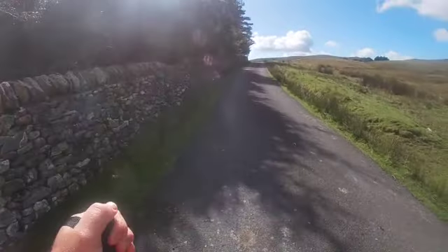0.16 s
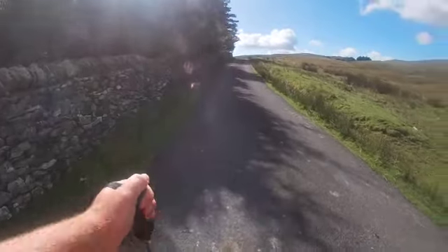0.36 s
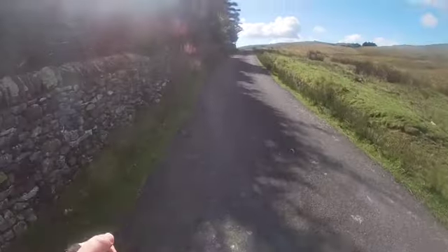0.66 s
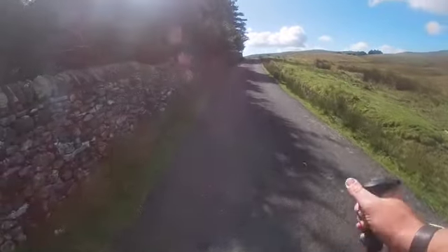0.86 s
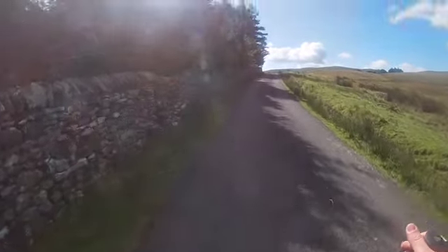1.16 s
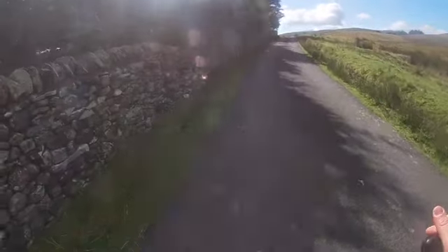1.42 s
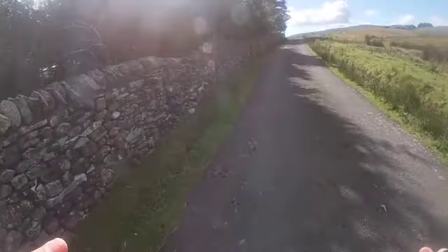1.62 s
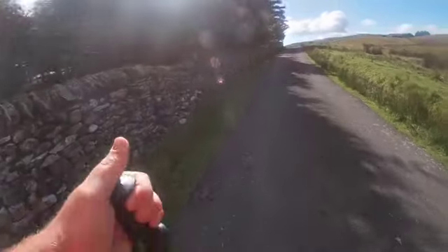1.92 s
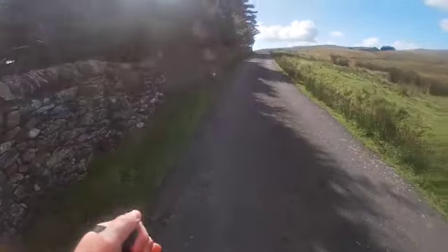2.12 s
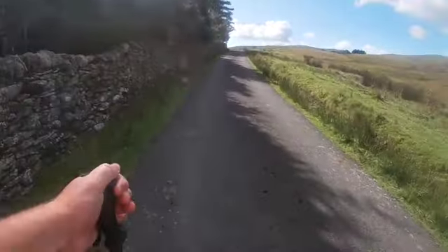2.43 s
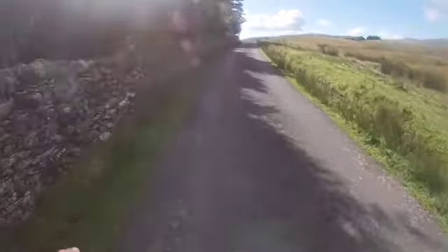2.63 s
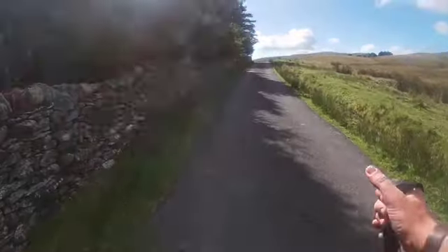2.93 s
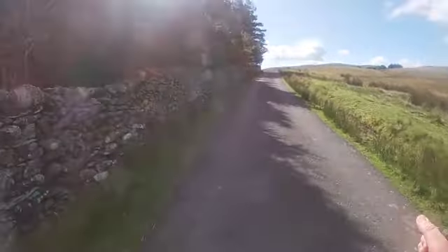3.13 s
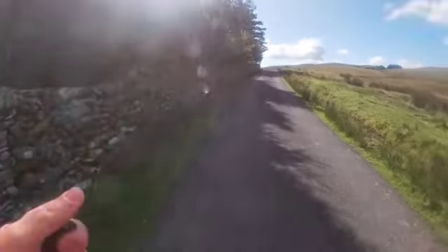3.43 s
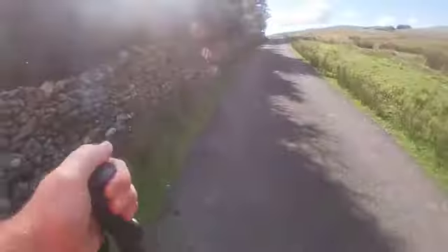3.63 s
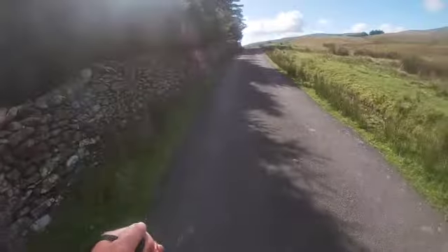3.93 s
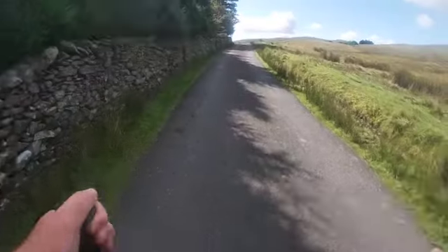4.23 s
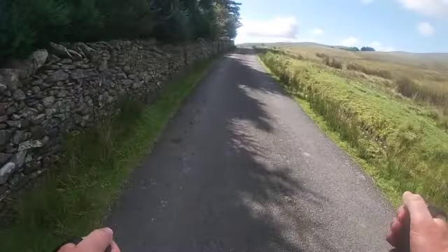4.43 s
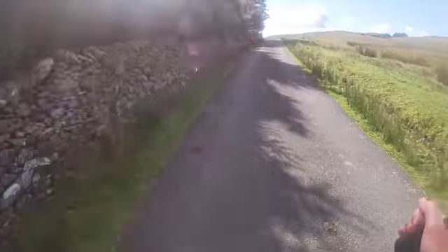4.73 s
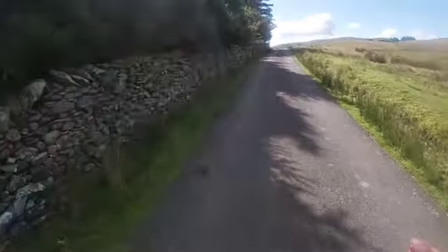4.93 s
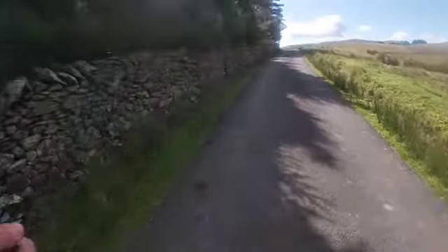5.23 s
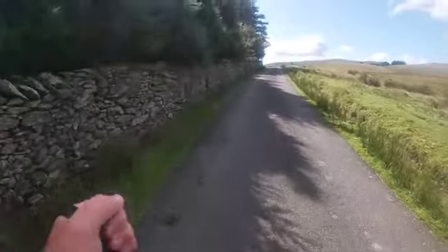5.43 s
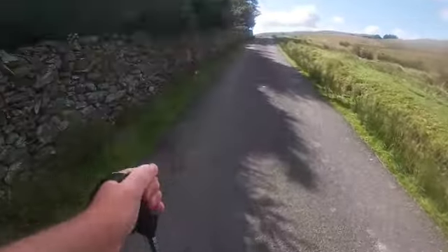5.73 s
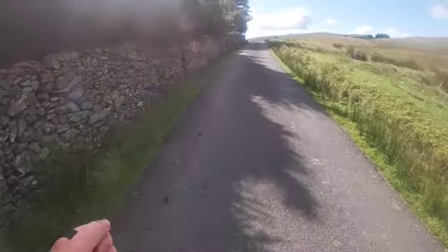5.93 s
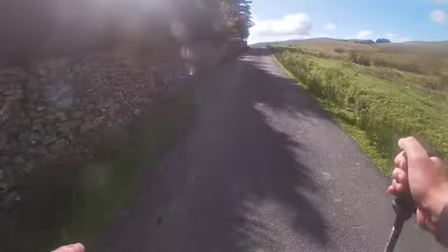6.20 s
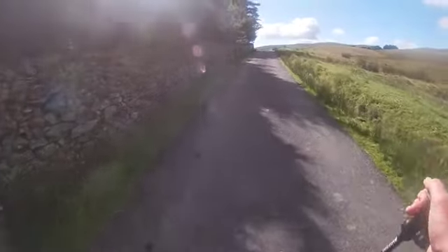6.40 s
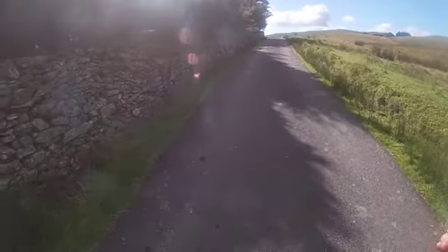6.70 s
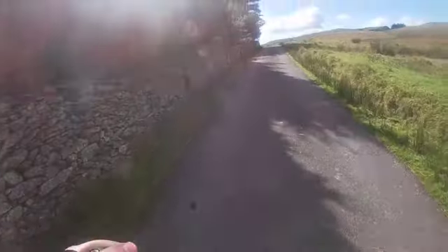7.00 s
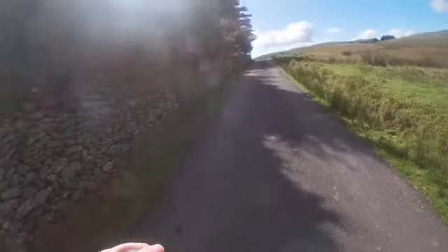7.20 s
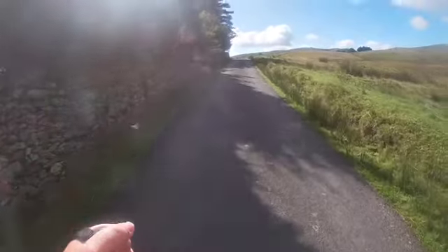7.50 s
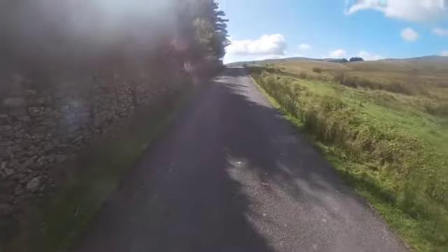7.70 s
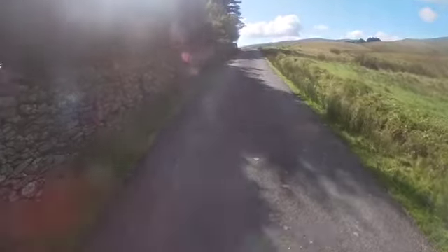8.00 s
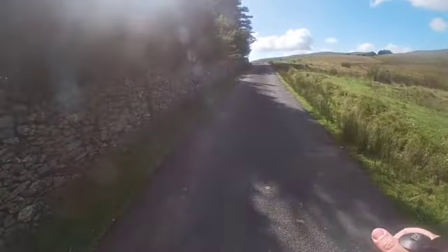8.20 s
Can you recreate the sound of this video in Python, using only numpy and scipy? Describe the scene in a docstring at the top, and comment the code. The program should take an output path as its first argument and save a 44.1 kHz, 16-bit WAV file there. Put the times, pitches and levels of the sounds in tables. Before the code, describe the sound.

Gritty footsteps at a steady walk on a paved lane, trekking pole tips clicking and chattering, cloth rubbing, low wind puffs rumbling on the microphone.

```python
"""A soft, steady outdoor hiss of filtered noise lies under everything; tiny chirps tick faintly in the treble.
Clothes and straps rub as modulated noise, and uneven puffs of air rumble on the microphone.
A walker goes along a paved lane at about two steps a second, a small camera worn on the body: soles scuff
gritty asphalt and heels knock, as shaped grains and damped resonances. The tips of two trekking poles
tap and chatter, as rough blows that excite the decaying modes of a shaft."""
import sys
import numpy as np
from scipy import signal
from scipy.fft import rfft, irfft
from scipy.io import wavfile
from scipy.ndimage import uniform_filter1d

SR = 44100
rng = np.random.default_rng(int(sys.argv[2]) if len(sys.argv) > 2 else 0)


def bounce(signal):
    """Save signal as a 16-bit WAV file at the path given by the first command-line argument."""
    frames = np.transpose(np.atleast_2d(signal))
    limited = np.clip(frames, -1, 1)
    pcm = np.round(limited * 32767).astype(np.int16)
    wavfile.write(sys.argv[1], SR, pcm)


N = 368235
TIME = np.arange(N) / SR
TOP_HZ = 12400  # upper band limit


def undb(db):
    """Amplitude ratio: decibels become a linear gain."""
    return 10 ** (np.asarray(db) / 20)


def unit(x):
    """Root-mean-square normalisation: scale to rms 1."""
    return x / np.sqrt(np.mean(x ** 2))


def colour(x, points, resonances=(), size=16384):
    """Minimum-phase filtering: impose a spectral outline with resonant bumps, at rms 1."""
    hz = np.maximum(np.fft.rfftfreq(size, 1 / SR), 1)
    at, db = np.transpose(points)
    shape = np.interp(np.log(hz), np.log(at), db)
    for centre, width, lift in resonances:
        shape = shape + lift / (1 + (2 * (hz - centre) / width) ** 2)
    # folding the cepstrum makes the phase minimum, so every grain rings only after it strikes
    cepstrum = irfft(np.log(undb(shape)))[:size // 2]
    response = irfft(np.exp(rfft(2 * cepstrum, size)))
    return unit(signal.oaconvolve(x, response)[:len(x)])


def walk(rate):
    """Slow random modulation: levels drawn every 1 / rate s, joined by straight slopes, rms 1."""
    hold = max(int(SR / rate), 1)
    levels = rng.standard_normal(N // hold + 1)
    return unit(uniform_filter1d(np.repeat(levels, hold), hold)[:N])


def grains(rate, spread_db):
    """Granular excitation: random clicks of scattered size, about rate of them a second, rms 1."""
    spread = undb(spread_db * np.minimum(rng.exponential(size=N), 4))
    sizes = rng.standard_normal(N) * spread
    struck = rng.random(N) < rate / SR
    return unit(sizes * struck)


def ring(modes, tilt_db=0, detune=0):
    """Modal decay: damped sinusoids after one blow, tilted in dB per octave by its hardness."""
    hz, db, t60 = np.transpose(modes)[:, :, None]
    t = TIME[:int(t60.max() * SR)]
    db = db + tilt_db * np.log2(hz / hz[0])
    hz = hz * (1 + detune * rng.standard_normal(hz.shape))
    sign = (-1) ** np.arange(len(modes))[:, None]  # neighbouring modes swing opposite ways
    return np.sum(sign * undb(db - 60 * t / t60) * np.sin(2 * np.pi * hz * t), axis=0)


def contact(seconds, rough):
    """Impact and friction: an impulse, then a noisy skid decaying with this time constant."""
    t = TIME[:SR // 10]
    skid = rng.standard_normal(len(t)) * np.exp(-t / seconds)
    return (t == 0) + rough * skid / np.linalg.norm(skid)


def add(track, s, sound, db):
    """Superposition: add a sound from time s with the given peak level."""
    start = max(int(s * SR), 0)
    part = sound[:N - start]
    track[start:start + len(part)] += part * undb(db) / np.abs(sound).max()


def around(x, hz, octaves, order):
    """Band-pass resonance: keep so many octaves either side of a pitch."""
    band = [hz / 2 ** octaves, min(hz * 2 ** octaves, TOP_HZ)]
    return signal.sosfilt(signal.butter(order, band, "band", fs=SR, output="sos"), x)


def swell(s, rise, fall, shape=2):
    """Smooth envelope: a rise to 1 at time s, and a fall, with 1/e times rise and fall."""
    out = np.zeros(N)
    near = slice(max(int((s - 4 * rise) * SR), 0), int((s + 4 * fall) * SR))
    t = TIME[near] - s
    out[near] = np.exp(-np.abs(t / np.where(t < 0, rise, fall)) ** shape)
    return out


# resonances of the camera's housing (f/Hz, width at half lift/Hz, lift/dB); also colour later sounds
HOUSING_RESONANCES = [(644.4, 15.6, 9.5), (1380, 10, 7.5), (1830, 277, 10.5), (2194, 115, 6),
                      (3190, 130, 7), (3730, 330, 5.5), (4720, 350, 4.5), (7490, 160, 8.5)]
# the even hiss of the open air: spectral outline (f/Hz, relative level/dB)
OPEN_AIR_OUTLINE = [(100, 0), (250, 0), (480, -14), (750, -5.5), (1080, 0.5), (1400, 0), (1900, -6.5),
                    (2300, -9), (2700, -14), (4000, -18), (5800, -15.5), (6800, -23), (10000, -29),
                    (12000, -36.5)]


def open_air(level_db=-61.5):
    """Stationary noise: a smooth hiss stays while the walker's own noises come and go."""
    return undb(level_db) * colour(rng.standard_normal(N), OPEN_AIR_OUTLINE, HOUSING_RESONANCES)


# lulls of air and clothes, mostly dips
# (t/s, half length to 1/e/s, strap and breeze level change/dB, hiss and swish level change/dB)
LULL_TIMES = [(0.232, 0.094, -11, -4), (1.83, 0.057, -7.5, -10), (2.413, 0.027, 1.5, -10),
              (3.783, 0.056, -5, -6), (4.396, 0.031, -4, -5), (4.55, 0.056, -6, -10), (5.54, 0.15, -4, 0),
              (6.237, 0.023, -10, 2.5), (7.23, 0.093, -7.5, -6.5), (8.066, 0.048, -5, -13)]


def lulls(depths_db):
    """Level modulation: the summed lulls in dB, for every sample."""
    return sum(db * swell(s, length, length) for (s, length, *_), db in zip(LULL_TIMES, depths_db))


# steps that set straps and sleeves moving (t/s, nominal strap rub level/dB, nominal hiss level/dB)
STEP_TIMES = [(0.061, -58, -55.5), (0.511, -55.5, -55.5), (1.00, -62, -59.5), (1.453, -57.5, -54),
              (2.084, -64, -59), (2.549, -59.5, -57.5), (3.114, -62.5, -56.5), (3.593, -59, -58.5),
              (4.266, -64, -58.5), (4.733, -55.5, -58), (5.31, -57.5, -58.5), (5.775, -57.5, -54.5),
              (6.396, -66.5, -59), (6.837, -56, -56), (7.448, -61, -58.5), (7.937, -57, -57)]
# single strokes of a strap or sleeve as the arms swing
# (t/s, half length to 1/e/s, nominal strap level/dB, nominal hiss level/dB)
CLOTH_STROKES = [(0.407, 0.021, -47, -56), (0.706, 0.067, -54.5, -57), (1.542, 0.028, -57.5, -72),
                 (1.994, 0.11, -56.5, -91), (2.78, 0.25, -57, -89), (3.286, 0.046, -57.5, -58.5),
                 (3.95, 0.051, -59.5, -79), (4.12, 0.026, -57.5, -66), (4.278, 0.036, -70, -57),
                 (4.489, 0.027, -60, -57), (4.994, 0.23, -65, -56.5), (5.19, 0.041, -60, -67),
                 (5.41, 0.023, -56, -69), (6.038, 0.057, -51, -54.5), (6.34, 0.087, -66, -55),
                 (6.915, 0.017, -52.5, -70), (7.54, 0.011, -55.5, -55.5), (7.982, 0.025, -51, -61)]
SWING_S = 0.17  # 1/e time of the clothes' motion either side of a step


def cloth_motion(step_db, rest_db, lull_db, rub_db):
    """Amplitude modulation: cloth swells with each step, sinks between, and strokes add in power."""
    times = np.array(STEP_TIMES)[:, 0]
    swing = np.minimum(sum(swell(s, SWING_S, SWING_S) for s in times), 1)
    strokes = sum(undb(db) * swell(s, length, length)
                  for (s, length, *_), db in zip(CLOTH_STROKES, rub_db))
    walking_db = np.interp(TIME, times, step_db) + rest_db * (1 - swing) + lulls(lull_db)
    return np.hypot(undb(walking_db), strokes)


# spectral outline of the walker's hiss (f/Hz, relative level/dB)
HISS_OUTLINE = [(200, 0.5), (480, -17), (750, -6), (1080, 1.5), (1400, 0.5), (1900, -5), (2300, -7),
                (2700, -14), (5000, -30.5), (10000, -34.5)]
# spectral outline of the swish of the sleeves (f/Hz, relative level/dB)
SWISH_OUTLINE = [(1200, -9), (2500, -6), (3500, -5.5), (4300, -8), (5800, -8), (6700, -17.5), (8000, -22.5),
                 (9000, -20.5), (11000, -26), (13000, -31)]


def air(swish_db=-6.5, rest_db=-2, folds_db=1.73, folds_rate=16):
    """Friction noise: soft hiss and the granular swish of cloth waver together as folds slide."""
    hiss = colour(rng.standard_normal(N), HISS_OUTLINE, HOUSING_RESONANCES)
    hiss = hiss * undb(0.7 * walk(45))
    swish = colour(grains(rate=14000, spread_db=-1.0), SWISH_OUTLINE, HOUSING_RESONANCES)
    swish = swish * undb(0.7 * walk(45))
    motion = cloth_motion(np.array(STEP_TIMES)[:, 2], rest_db,
                          np.array(LULL_TIMES)[:, 3], np.array(CLOTH_STROKES)[:, 3])
    folds = undb(-0.53 + folds_db * walk(folds_rate))
    return (hiss + undb(swish_db) * swish) * motion * folds


# the case rings with each tick (f/Hz, level relative to the tick/dB, t60/s)
TICK_CASE_MODES = [(7230, -2.5, 0.019)]
TICK_HZ = 29.966  # ticks a second, before jitter
TICK_START_HZ, TICK_GLIDE_HZ_PER_S = 6630, 627000  # mean glide
TICK_RISE_S, TICK_FALL_S = 0.00083, 0.0026  # time constants


def ticking(first=0.013, db=-64.5, scatter_db=2.5, jitter=0.0032, rasp_hz=900):
    """Frequency-swept pulses: tiny raspy upward chirps, probably from the camera's electronics."""
    out = np.zeros(N)
    t = TIME[:SR // 110]
    shape = (1 - np.exp(-(t / TICK_RISE_S) ** 2)) * np.exp(-t / TICK_FALL_S)
    rasp = signal.sosfilt(signal.butter(2, rasp_hz, fs=SR, output="sos"), rng.standard_normal(N))
    for s in np.arange(first, TIME[-1] - 0.03, 1 / TICK_HZ):
        late, size, glide = rng.standard_normal(3)
        when, tick_db = s + jitter * late, db + scatter_db * size
        hz = TICK_START_HZ + TICK_GLIDE_HZ_PER_S * (1 + 0.19 * glide) * t
        chirp = shape * rasp[int(s * SR):][:len(t)] * np.sin(2 * np.pi * np.cumsum(hz) / SR)
        add(out, when, chirp, tick_db)
        add(out, when, ring(TICK_CASE_MODES, detune=0.014), tick_db + TICK_CASE_MODES[0][1])
    return out


# spectral outline of the straps' rub (f/Hz, relative level/dB)
STRAP_OUTLINE = [(60, -25), (100, -14.5), (135, -1.5), (170, 1), (230, -5), (300, -8.5), (380, -20),
                 (520, -29), (900, -77)]
# heavy footfalls jolting the camera (t/s, peak level/dB)
CAMERA_JOLTS = [(1.401, -36.5), (3.536, -28), (5.703, -35.5), (6.783, -33)]
# modes of the jolted camera (f/Hz before detuning, relative level/dB, t60/s)
CAMERA_MODES = [(62, -2, 0.086), (130.3, -5.5, 0.13), (170, -3, 0.052), (237, -12, 0.11),
                (282, -14.5, 0.062)]


def body(rest_db=-3.5, waver_db=2.5, waver_rate=24):
    """Friction and modal impact: straps rub dully, and some footfalls thud by shaking the camera."""
    motion = cloth_motion(np.array(STEP_TIMES)[:, 1], rest_db,
                          np.array(LULL_TIMES)[:, 2], np.array(CLOTH_STROKES)[:, 2])
    waver = undb(2.74 + waver_db * walk(waver_rate))
    out = colour(rng.standard_normal(N), STRAP_OUTLINE) * motion * waver
    for s, db in CAMERA_JOLTS:
        thud = signal.fftconvolve(contact(0.011, rough=0.26), ring(CAMERA_MODES, detune=0.059))
        add(out, s, thud, db)
    return out


# spectral outline of the wind rumble (f/Hz, relative level/dB)
RUMBLE_OUTLINE = [(5, -28), (9, 2.5), (16, 9.5), (29, -5), (41, -12.5), (60, -22.5), (90, -37.5),
                  (150, -44), (400, -91.5)]
# puffs of air over the microphone as the body bobs and the arms swing
# (t/s, half length to 1/e/s, deep eddy level/dB, flutter level/dB)
AIR_PUFFS = [(0.062, 0.1, -22, -45), (0.341, 0.026, -35, -40.5), (0.531, 0.077, -17.5, -47),
             (0.909, 0.032, -33, -42.5), (1.048, 0.081, -25.5, -53), (1.459, 0.048, -14, -36.5),
             (1.598, 0.05, -28.5, -55), (1.727, 0.025, -55, -49), (2.048, 0.024, -37, -40),
             (2.128, 0.098, -25, -59), (2.291, 0.033, -29.5, -52), (2.496, 0.031, -21, -47),
             (2.608, 0.052, -21.5, -47), (2.964, 0.09, -36.5, -53), (3.11, 0.023, -19, -40.5),
             (3.227, 0.047, -28.5, -44.5), (3.452, 0.026, -50, -40.5), (3.586, 0.048, -17, -50),
             (3.695, 0.068, -22, -45), (4.127, 0.035, -37, -50), (4.271, 0.068, -24, -63),
             (4.344, 0.024, -34, -41.5), (4.666, 0.086, -33.5, -48), (4.757, 0.04, -21, -42),
             (4.888, 0.032, -30.5, -45.5), (5.195, 0.12, -35.5, -46.5), (5.347, 0.038, -22, -62),
             (5.464, 0.039, -44, -40.5), (5.741, 0.042, -18.5, -40), (5.843, 0.052, -18, -48),
             (6.432, 0.099, -24, -60), (6.585, 0.047, -34.5, -39.5), (6.845, 0.067, -18.5, -43),
             (7.132, 0.027, -42, -41), (7.425, 0.078, -29, -52), (7.532, 0.11, -30.5, -63),
             (7.95, 0.084, -21, -47), (8.098, 0.017, -29.5, -54)]
GUST_SHAPE = 1.6  # exponent of a gust's flanks
BREEZE_DB, BREEZE_FLUTTER_DB = -43.5, -62  # nominal levels between gusts


def wind(split_hz=44, breeze_waver_db=6.5, breeze_rate=9):
    """Turbulent pressure: slow eddies and quicker flutter come in puffs over a light breeze."""
    rumble = colour(rng.standard_normal(N), RUMBLE_OUTLINE)
    breeze = undb(lulls(np.array(LULL_TIMES)[:, 2]) + breeze_waver_db * walk(breeze_rate))
    _, _, deep_db, flutter_db = np.transpose(AIR_PUFFS)
    bands = (("low", deep_db, BREEZE_DB), ("high", flutter_db, BREEZE_FLUTTER_DB))
    out = np.zeros(N)
    for side, levels_db, rest_db in bands:
        eddies = signal.sosfiltfilt(signal.butter(5, split_hz, side, fs=SR, output="sos"), rumble)
        # dividing by the running rms leaves the puffs to set the level
        strength = uniform_filter1d(np.sqrt(uniform_filter1d(eddies ** 2, SR // 20)), SR // 40)
        gusts = sum(undb(db) * swell(s, length, length, GUST_SHAPE)
                    for (s, length, *_), db in zip(AIR_PUFFS, levels_db))
        out += eddies / strength * np.hypot(gusts, undb(rest_db) * breeze)
    return out


# spectral outline of grit under a sole (f/Hz, relative level/dB)
GRIT_OUTLINE = [(120, -5), (250, 11.5), (500, -3.5), (900, 2.5), (1400, 4.5), (1900, -6), (2700, -6.5),
                (3500, -8.5), (4600, -15), (6000, -13), (7000, -23.5), (9000, -22), (11000, -36.5)]
# soles on asphalt (t of the strongest rub/s, 1/e rise/s, 1/e fall/s, nominal level/dB,
# gain below about 900 Hz/dB, gain around 2900-5200 Hz/dB)
SOLE_SCUFFS = [(0.372, 0.016, 0.013, -47.5, -20, 4.5), (0.405, 0.02, 0.023, -44.5, -9, 5.5),
               (0.518, 0.025, 0.018, -47, -9, 6), (0.883, 0.009, 0.0035, -49.5, -5, -18),
               (1.02, 0.086, 0.044, -52, -7, 1), (1.371, 0.0069, 0.031, -47.5, -17, 4),
               (1.419, 0.022, 0.038, -47, -5.5, 0), (1.965, 0.029, 0.013, -58, 3, 3),
               (2.44, 0.015, 0.058, -48, -7, 8.5), (3.535, 0.075, 0.042, -50.5, 1, 5.5),
               (3.986, 0.009, 0.041, -52.5, -15, -16), (4.14, 0.048, 0.045, -52.5, -7, 0.5),
               (4.586, 0.0019, 0.014, -53, -2, 5), (4.616, 0.017, 0.032, -47, -2.5, 0.5),
               (4.71, 0.021, 0.012, -50.5, -2, -16), (5.672, 0.035, 0.012, -49.5, -1, 4),
               (5.71, 0.03, 0.018, -46.5, 0, 5), (5.825, 0.021, 0.026, -56.5, 8.5, 3),
               (6.751, 0.013, 0.033, -46, 4.5, 7), (6.777, 0.015, 0.032, -46.5, -3, 0.5),
               (7.00, 0.02, 0.03, -58, 4, 9.5), (7.337, 0.012, 0.05, -58.5, 13, 7),
               (7.76, 0.16, 0.039, -56, -6, 4.5), (7.850, 0.05, 0.05, -46.5, 1.5, 7),
               (8.259, 0.022, 0.052, -52, -3, -10)]


def soles():
    """Granular stick-slip friction: grit grinds under a sole, swelling and dying with its pressure."""
    grit = colour(grains(rate=2600, spread_db=0.5), GRIT_OUTLINE, HOUSING_RESONANCES)
    grit = grit * undb(2.1 * walk(160))  # the sole grips and slips
    low = signal.sosfilt(signal.butter(1, 900, fs=SR, output="sos"), grit)
    # the bite of sharp stones
    high = signal.sosfilt(signal.butter(1, [2900, 5200], "band", fs=SR, output="sos"), grit)
    out = np.zeros(N)
    for s, rise, fall, db, weight_db, treble_db in SOLE_SCUFFS:
        near = slice(max(int((s - 4 * rise) * SR), 0), int((s + 5 * fall) * SR))
        t = TIME[near] - s
        pressure = np.exp(-np.abs(t / np.where(t < 0, rise, fall)) ** 2.75)
        rub = grit[near] + (undb(weight_db) - 1) * low[near] + (undb(treble_db) - 1) * high[near]
        out[near] += undb(db) * pressure * rub
    return out


# patches of gravel crushed under a sole
# (t/s, half length/s, rms level over the whole length/dB, median f of the grains/Hz)
GRAVEL_PATCHES = [(0.375, 0.013, -56, 3450), (0.403, 0.033, -51, 1850), (0.516, 0.017, -56, 2560),
                  (1.409, 0.035, -52.5, 1590), (1.418, 0.022, -59, 3400), (2.444, 0.007, -42.5, 3330),
                  (2.457, 0.009, -48, 3700), (3.528, 0.036, -51, 1870), (4.615, 0.034, -54, 3360),
                  (5.706, 0.022, -48.5, 1800), (6.777, 0.023, -51, 2550), (7.81, 0.0075, -46, 1760),
                  (7.849, 0.015, -53, 3750), (7.865, 0.026, -47, 2070)]


def crunch(rate=900, scatter_octaves=0.2, spread_db=1.0, cycles=2.1):
    """Granular fracture: gravel yields grain by grain, each with its own size and short damped ping."""
    out = np.zeros(N)
    t = TIME[:SR // 100]
    for s, length, db, hz in GRAVEL_PATCHES:
        patch = np.zeros(N)
        count = int(2 * length * rate)
        for slot, (when, size, pitch) in enumerate(rng.standard_normal((count, 3))):
            place = 2 * (slot + 0.5 + 0.5 * when) / count - 1  # about -1 to 1 along the patch
            turns = hz * 2 ** (scatter_octaves * pitch) * t
            ping = np.sin(2 * np.pi * turns) * np.exp(-turns / cycles)
            add(patch, s + length * place, ping, spread_db * size - 6 * place ** 2)
        patch = colour(patch, [(20, 0), (SR / 2, 0)], HOUSING_RESONANCES)
        out += undb(db) * patch * np.sqrt(2 * length * SR / np.sum(patch ** 2))
    return out


# single stones cracking underfoot (t/s, peak level/dB, f/Hz, skid time constant/ms)
STONE_CRACKS = [(0.411, -39, 1900, 2), (0.518, -36, 1900, 1.5), (0.803, -45, 1920, 0.79),
                (1.37, -39, 1900, 0.91), (1.396, -39, 1700, 2), (1.489, -33, 1750, 2.3),
                (2.301, -44.5, 3200, 3.4), (3.526, -38, 1900, 0.9), (3.533, -36, 1900, 1),
                (3.9744, -41, 1450, 1.5), (4.013, -48, 1500, 1.7), (4.1105, -39.5, 2600, 1.6),
                (4.697, -45, 1990, 6.6), (4.857, -40, 1690, 4.5), (5.705, -39, 1800, 2.2),
                (5.81, -39, 2000, 0.69), (6.139, -44, 1900, 1), (6.308, -40, 1800, 8),
                (6.742, -39, 2200, 2.9), (6.773, -30, 1600, 1.5), (7.776, -42, 3540, 2.4),
                (7.829, -28, 1600, 1.8), (7.8295, -37.5, 3600, 1.4), (7.864, -19.5, 2250, 1.6)]


def stones(octaves=0.53):
    """Band-limited impact: loose grit snaps in short bright clicks, a few loud and many faint."""
    out = np.zeros(N)
    faint = [(TIME[-1] * when, -54 + 6 * size ** 2, 1500 * 2 ** pitch, 1)
             for when, size, pitch in rng.random((45, 3))]
    for s, db, hz, ms in STONE_CRACKS + faint:
        add(out, s, around(contact(ms / 1000, rough=3.5), hz, octaves, order=3), db)
    return out


# modes of the pole shaft (f/Hz before detuning, level before brightness tilt/dB, t60/s)
SHAFT_MODES = [(1350, 3, 0.032), (1600, 9, 0.012), (1830, 4, 0.024), (2145, -6, 0.034),
               (2436, -12.5, 0.042), (2760, -4, 0.0098), (3300, -14.5, 0.029), (3950, -10.5, 0.015),
               (4750, -12, 0.0049), (5460, -16, 0.0055), (6150, -27, 0.021), (7340, -18.5, 0.0064),
               (9100, -21.5, 0.0023)]
RING_RISE_S, RING_WOBBLE = 0.001, 0.053  # wobble is the rms fraction of the pitch
RING_T60_S = 0.025  # at the shaft's lowest mode; shorter above


def favoured_ring(hz, skid_s, hold_share=0.56):
    """Driven then damped resonance: one pitch wobbles while the tip skids, then the hand damps it."""
    t = TIME[:SR // 20]
    wobble = unit(uniform_filter1d(rng.standard_normal(len(t)), SR // 700))
    t60 = RING_T60_S * (SHAFT_MODES[0][0] / hz) ** 0.47
    decay = 1000 ** (-np.maximum(t - hold_share * skid_s, 0) / t60)
    turns = np.cumsum(hz * (1 + RING_WOBBLE * wobble)) / SR
    return (1 - np.exp(-(t / RING_RISE_S) ** 2)) * decay * np.sin(2 * np.pi * turns)


# pole tips striking and bouncing (t/s, peak level/dB, brightness in dB per octave,
# skid time constant/ms, favoured ring f/Hz, its peak level/dB)
POLE_TAPS = [(0.437, -35.5, 7.5, 5, 5500, -43.5), (0.494, -39, 2, 3.9, 1110, -44),
             (1.4862, -33, 5.5, 2.5, 1480, -40), (1.49, -34.5, 4, 9.7, 2170, -40),
             (1.5005, -35, 7, 1.7, 3280, -44), (2.2293, -41, 5, 2, 5790, -54),
             (2.4396, -33, 6, 4.6, 3220, -46), (2.463, -39, 9, 4, 1480, -34.5),
             (3.1318, -33, 5, 5.9, 1466, -35), (3.1353, -40, 5, 3.2, 3950, -38),
             (3.1456, -38, 4, 3.5, 3950, -39), (3.153, -40.5, 7, 4.8, 3950, -42),
             (3.1863, -41, 1, 1.5, 3950, -53), (3.403, -43.5, 7, 1.3, 1830, -52),
             (4.0495, -46, 13, 5.4, 5860, -48), (4.051, -35, -9, 3.5, 3520, -41),
             (4.065, -52, 12, 4.4, 5800, -47), (4.0727, -45, 2, 1.7, 1650, -42),
             (5.7633, -42, 6, 5, 5840, -44.5), (5.7675, -39, 8, 2.2, 3500, -42),
             (5.7715, -41, 4, 3.5, 1600, -39), (6.632, -37, 4, 3, 2100, -43),
             (6.635, -30, 3, 1.7, 2050, -35), (6.6447, -40, 5, 3.6, 1550, -55),
             (7.329, -37, 10, 8, 1473, -31), (7.3303, -41, 6, 2.7, 4800, -43),
             (7.338, -49, 5, 2.5, 5070, -46), (7.3438, -41, 9, 9, 1480, -42),
             (7.3662, -34, 4, 1.7, 1600, -38), (7.369, -49, 3, 1.5, 1600, -39),
             (7.8025, -37, -2, 2.5, 2000, -33), (8.2389, -41, -4.5, 1.4, 1500, -41),
             (8.2423, -35, 7.5, 6.8, 1443, -27.5), (8.2527, -36.5, 5, 8.9, 1450, -32.5),
             (8.258, -36, 6, 5.8, 1470, -38), (8.266, -44, 10, 12, 5970, -50),
             (8.284, -49, 2, 2, 1400, -47)]


def poles(lowest_hz=1000, scrape_db=-11):
    """Impact-excited modes: the tip hits and skids, and the hand-damped shaft rings and buzzes on."""
    out = np.zeros(N)
    # a slim tube radiates little bass
    thin = signal.butter(3, lowest_hz, "high", fs=SR, output="sos")
    stone = signal.butter(2, [1200, 3400], "band", fs=SR, output="sos")
    for s, db, bright_db, skid_ms, ring_hz, ring_db in POLE_TAPS:
        push = contact(skid_ms / 1000, rough=7.5)
        buzz = contact(0.0092, rough=1.0)
        push[1:] += buzz[1:]  # without a second blow
        shaft = signal.fftconvolve(push, ring(SHAFT_MODES, bright_db, detune=0.02))[:len(push)]
        scrape = signal.sosfilt(stone, push)  # the tip's own broad rasp
        tap = signal.sosfilt(thin, unit(shaft) + undb(scrape_db) * unit(scrape))
        add(out, s, tap, db)
        add(out, s, favoured_ring(ring_hz, skid_ms / 1000), ring_db)
    return out


# hollow knocks of a heel landing flat (t/s, peak level/dB, f/Hz)
HEEL_KNOCKS = [(2.4235, -42, 1070), (2.440, -39.5, 365), (4.110, -41.5, 1100), (4.5825, -41, 790),
               (4.5845, -41, 1070), (5.809, -39.5, 1150), (7.330, -47, 526), (7.367, -50, 724),
               (7.826, -46, 514), (8.255, -40, 610)]


def heels(octaves=0.33):
    """Damped resonance: a heel's rough blow excites one broad band of the boot."""
    out = np.zeros(N)
    for s, db, hz in HEEL_KNOCKS:
        add(out, s, around(contact(0.0094, rough=3.8), hz, octaves, order=2), db)
    return out


def scene():
    """Linear superposition: all sources sum at one microphone, in the open with no echo."""
    surroundings = open_air() + air() + ticking() + body() + wind()
    footsteps = soles() + crunch() + stones() + heels()
    return (surroundings + footsteps + poles())[None]


def record(dry):
    """Low-pass filtering: the camera softens the highest treble and cuts the top."""
    soft = signal.sosfilt(signal.butter(4, 10600, fs=SR, output="sos"), dry)
    return signal.sosfilt(signal.ellip(8, 0.2, 70, TOP_HZ, fs=SR, output="sos"), soft)


dry = scene()
out = record(dry)
bounce(out)
```